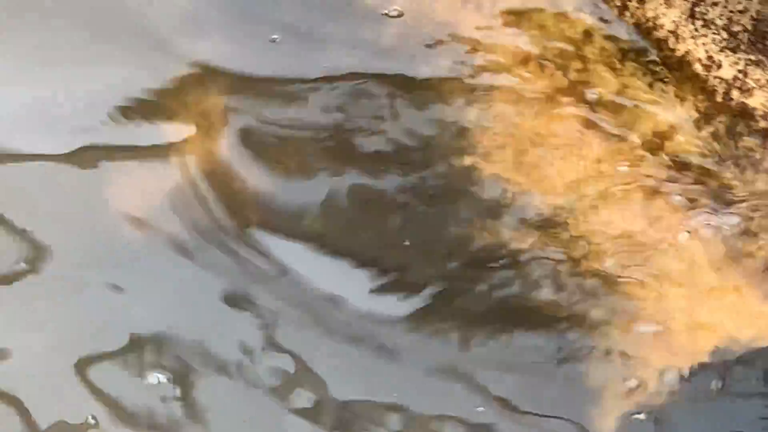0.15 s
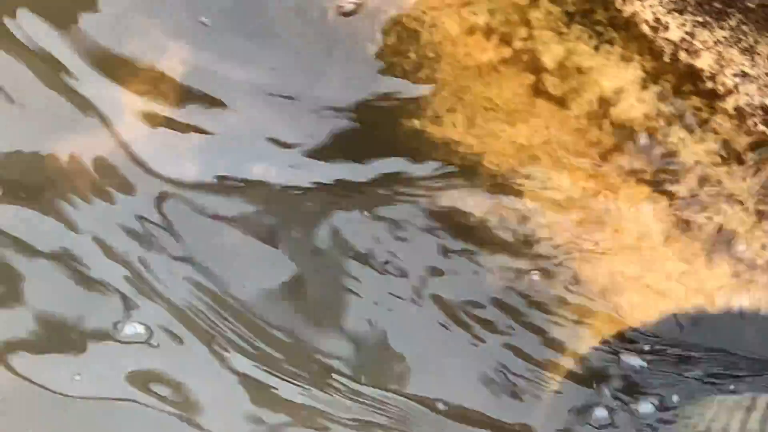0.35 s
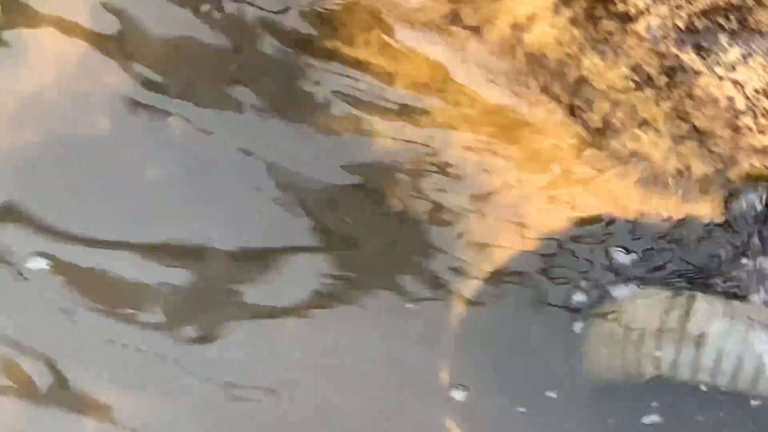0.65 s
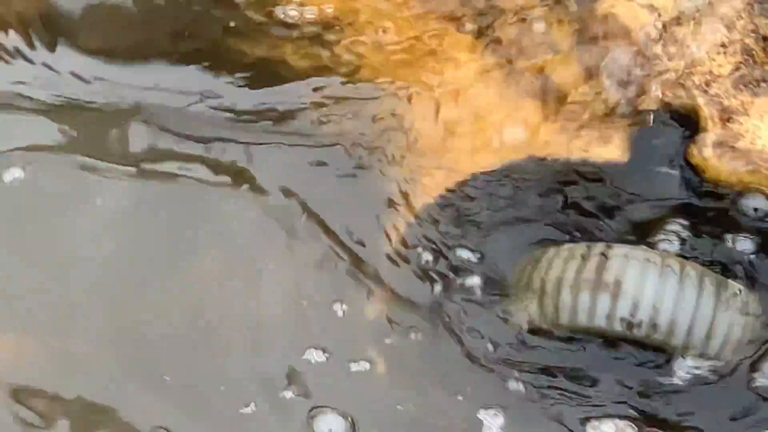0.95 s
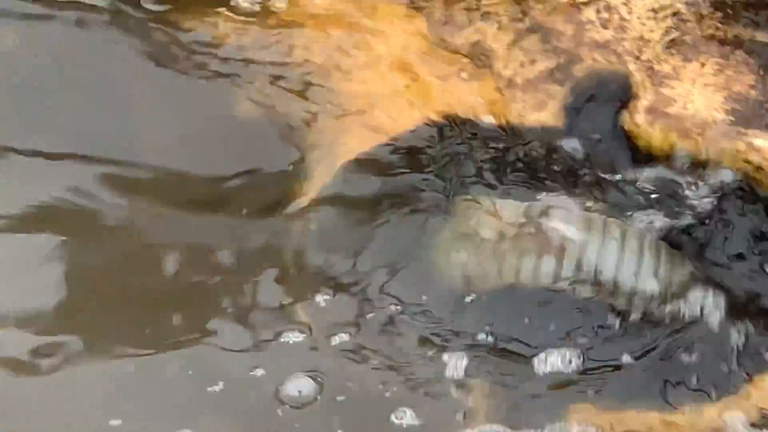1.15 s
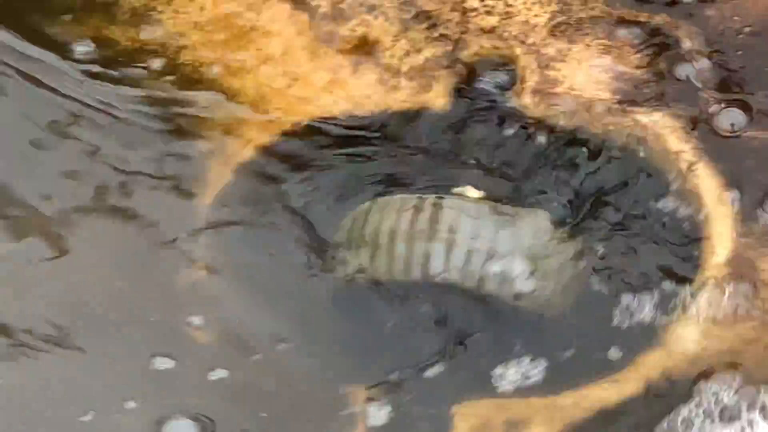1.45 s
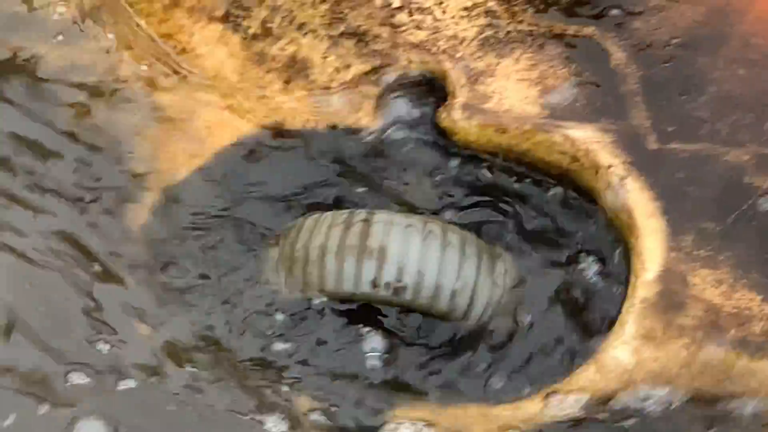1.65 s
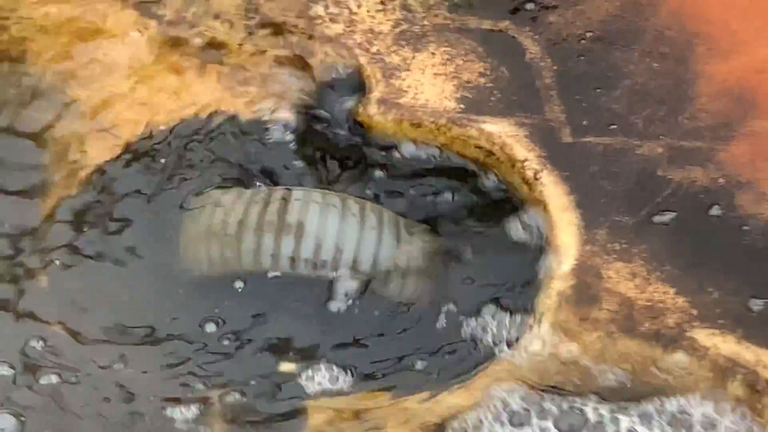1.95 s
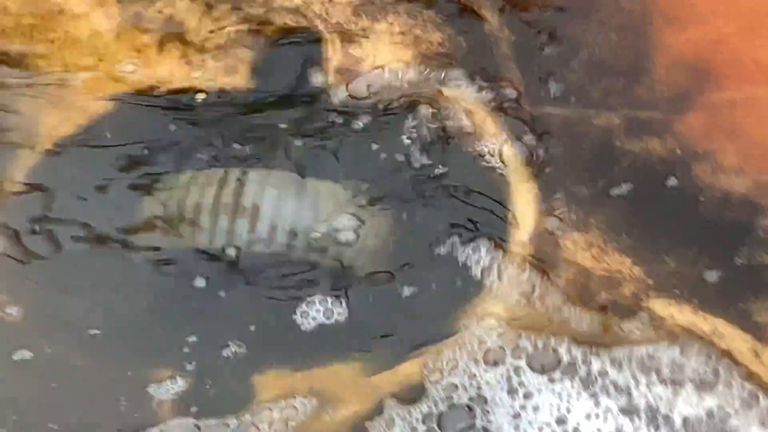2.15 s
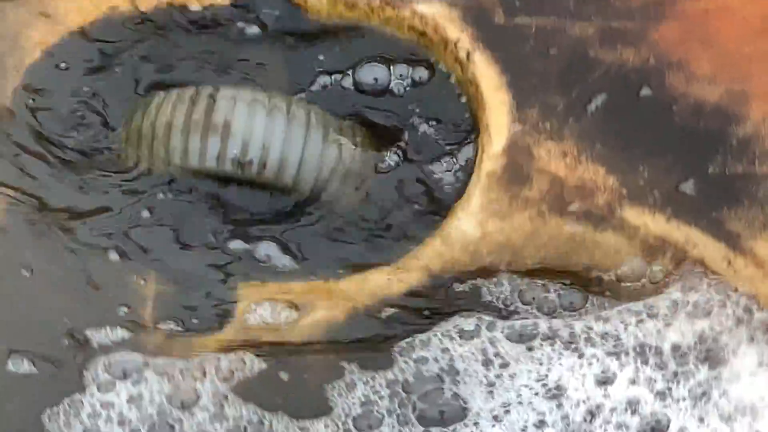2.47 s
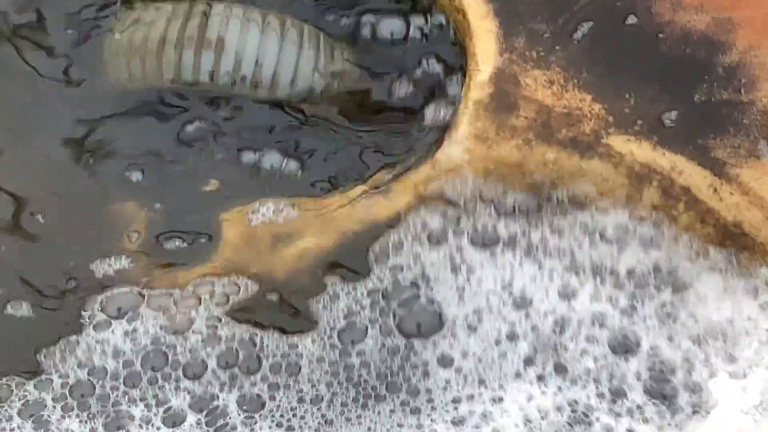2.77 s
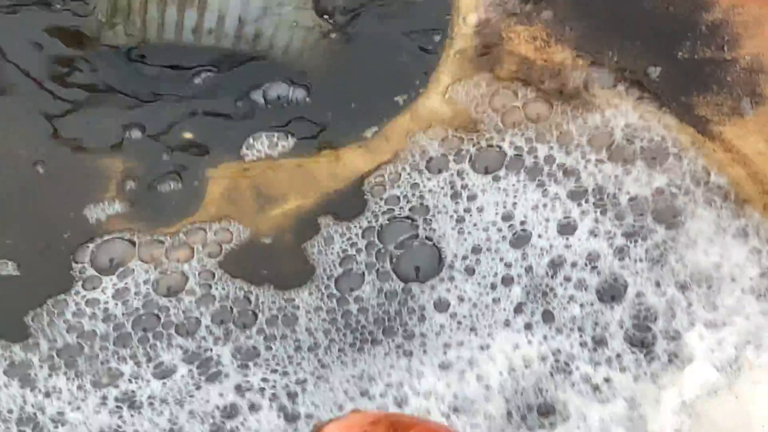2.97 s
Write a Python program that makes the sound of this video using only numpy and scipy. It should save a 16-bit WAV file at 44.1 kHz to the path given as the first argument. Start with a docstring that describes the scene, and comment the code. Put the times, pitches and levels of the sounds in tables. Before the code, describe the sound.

Small waves slap a dock right under a close stereo microphone. Light, uneven wet slaps come several per second; air gulps at 0.55, then a deep hollow glug with a low thud at 0.9. Droplets tick around 1.1, the strongest splashes land at 1.4, quick high bubble chirps at 1.85, more slaps from 2.1, and a short low gulp with thud at 2.6. A very faint trickling hiss runs underneath.

```python
"""At a dock on a lake, small waves lap right under a microphone with two ports.
Each slap is a short spray of noise and tiny ringing bubbles. Trapped air gulps low or chirps
high as gliding tones, and bursting droplets click as tiny puffs of bright noise.
The heaving water thuds low in the hull of the dock (deep noise that swells and sinks),
over a faint wash of flickering hiss and small drips."""
import sys
import numpy as np
from scipy import signal
from scipy.fft import rfft, irfft
from scipy.io import wavfile
from scipy.ndimage import uniform_filter1d

SR = 44100
rng = np.random.default_rng(int(sys.argv[2]) if len(sys.argv) > 2 else 0)


def wrap_up_sound(samples):
    """Save the sound to the file named by the first command line argument, as 16-bit audio."""
    columns = np.atleast_2d(samples).T
    # keep every value between -1 and 1, then stretch to whole-number steps
    tamed = np.clip(columns, -1, 1)
    steps = np.round(tamed * 32767).astype(np.int16)
    wavfile.write(sys.argv[1], SR, steps)


N = 136710  # length in samples, about 3.1 s

# colour common to all spray: f/Hz, relative level/dB
SPRAY_COLOUR = [(250, 8.5), (500, 5), (1400, 1.5), (2300, 1.5), (3200, -5.5), (4500, 6.5), (6800, -10.5),
                (9500, 0), (16000, -18.5)]
# three places the spray comes from; those nearer the middle lose some of the left port's lead: lag/s
PLACE_LAG_S = (0, .0001, .0004)


def slaps():
    """A wave hits the dock and throws up spray: a quick rise, a fade and a faint tail."""
    # slaps: t/s, relative level/dB, then the balance of low, middle and high spray, each level/dB
    slap_table = [(0.026, -32.5, -5, -35, -36.5), (0.108, -34, -0.5, -14, -16),
                  (0.209, -34, -9.5, -9.5, -15), (0.286, -29, -10, -9, -35), (0.343, -37, -5, -11, -12.5),
                  (0.381, -39, 0, 5, -10), (0.402, -26, -9, -28, -16), (0.492, -31.5, 11, -1, -23),
                  (0.549, -28, -6, -3.5, -7), (0.77, -27, -6, -17, -32.5),
                  (0.83, -36.5, -14.5, -12.5, -31.5), (1.05, -39, -20, 1, -4.5), (1.11, -41.5, -4, 12, -17),
                  (1.187, -39.5, -5, -4, 4), (1.224, -34, -27, -6.5, -16), (1.37, -21, -6.5, -7, -12.5),
                  (1.431, -24, -7, -7.5, -7.5), (1.453, -29.5, -5, -8, -11), (1.642, -35, -40, 2, -14.5),
                  (1.664, -38, -1, -21, -25), (1.851, -32.5, -38, 2, -3), (1.886, -36, -7, -5, -14.5),
                  (2.011, -44, -24, 2, -11), (2.082, -24, 2.5, -9.5, -43), (2.092, -35.5, -9, 3.5, -6),
                  (2.196, -36, 8, 13, -20), (2.225, -28, -8, -11.5, -10), (2.294, -37, -1.5, -12, -32),
                  (2.401, -33.5, -7, -7, -29), (2.423, -33, -14, 0, -10.5), (2.56, -35, 9, -10, -46),
                  (2.779, -39.5, -11.5, -11, -37), (2.82, -35.5, -23, -18, -28),
                  (2.858, -38.5, -14, -13, -11), (2.892, -38.5, -5, -6, -8.5), (2.986, -30, -9.5, -13, -10),
                  (3.08, -36.5, -12.5, -7, -27)]
    # middle of the low, middle and high spray: f/Hz
    band_hz = (900, 2600, 8000)
    rise_s, fade_s, tail_s, tail_db = 0.0012, 0.0067, 0.019, -10.5
    lead_s, lead_db = 0.007, -17  # first droplets before the blow
    fizz_share, all_slaps_db = 0.24, -3.5
    length = 4096
    out = np.zeros((len(PLACE_LAG_S), N))
    fizz = bubbles(N, 2500, 3.5, 600, 12980, cycles=3.0)

    t = np.arange(length) / SR
    lead = amp(lead_db) * np.minimum(t / lead_s, 1)
    since_blow = np.maximum(t - lead_s, 0)
    rise = 1 - np.exp(-(since_blow / rise_s) ** 2)
    fade = np.exp(-(since_blow / fade_s) ** 1.36)
    tail = amp(tail_db) * np.exp(-since_blow / tail_s)
    shape = (lead + rise) * (fade + tail)

    for k, (s, level_db, low_db, mid_db, high_db) in enumerate(slap_table):
        # each slap takes another stretch of the fizz
        spray = fizz_share * np.roll(fizz, -round(s * SR))[:length]
        spray = spray + (1 - fizz_share) * rng.standard_normal(length)
        balance = np.array([low_db, mid_db - 2, high_db - 3.5])
        balance = balance - balance.max()  # the strongest band stays at 0 dB
        spray = coloured(coloured(spray, SPRAY_COLOUR), list(zip(band_hz, balance)))
        slap = evened(spray * shape) * shape.std()
        place = out[k % len(out)]  # the places take turns
        add(place, s - 0.0015 - lead_s, amp(level_db + all_slaps_db) * slap)
    return out


def gulps():
    """A large pocket of trapped air gives a low, slightly rough tone that sags in pitch."""
    # gulps: t/s, level/dB, pitch halfway through f/Hz, length/s
    gulp_table = [(0.402, -28, 178, 0.024), (0.457, -31.5, 342, 0.017), (0.552, -16.5, 393, 0.014),
                  (0.562, -21, 237, 0.027), (0.882, -16.5, 177, 0.021), (0.888, -10.5, 75, 0.031),
                  (0.948, -13.5, 107.8, 0.023), (1.375, -20, 357, 0.032), (1.671, -29, 239, 0.0093),
                  (1.817, -25.5, 253, 0.0083), (2.079, -32.5, 367.5, 0.028), (2.288, -23, 81.3, 0.063),
                  (2.298, -34, 314, 0.054), (2.425, -29, 369, 0.022), (2.585, -13.5, 132, 0.012),
                  (2.828, -28, 316, 0.022)]
    sag, rough = 0.12, 0.15  # pitch shift each way and roughness, as shares
    out = np.zeros(N)
    for s, level_db, hz, length in gulp_table:
        add(out, s, amp(level_db) * tone(hz * (1 + sag), hz * (1 - sag), length, rough))
    return out


def chirps():
    """A small pocket of air gives a short gliding tone; the rougher it is, the more it hisses."""
    # chirps: t/s, level/dB, start f/Hz, end f/Hz, length/s, roughness 0-1
    chirp_table = [(0.799, -47.5, 1334, 1666, 0.046, 0.03), (1.496, -36, 2240, 2480, 0.028, 0.48),
                   (1.509, -34.5, 1517, 2930, 0.031, 0.45), (1.51, -38, 4320, 5030, 0.042, 0.47),
                   (1.537, -40, 2310, 2400, 0.016, 0.46), (1.664, -28.5, 647, 383, 0.0099, 0.16),
                   (1.779, -44.5, 2110, 2520, 0.0063, 0), (1.8543, -19, 3320, 2730, 0.0058, 0.03),
                   (1.857, -29.5, 4340, 4810, 0.021, 0.83), (1.87, -24.5, 3706, 2483, 0.01195, 0.42),
                   (1.877, -28, 2963, 1640, 0.014, 0.58), (2.079, -25, 790, 464, 0.0121, 0.41),
                   (2.08, -34, 2260, 1940, 0.0066, 0.07), (2.562, -24.5, 1103, 1170, 0.0075, 0.22),
                   (2.615, -45.5, 1800, 2490, .014, 0), (2.617, -29.5, 1120, 1175, 0.0061, 0)]
    hiss_db = -16  # at full roughness
    out = np.zeros(N)
    for s, level_db, hz0, hz1, length, rough in chirp_table:
        sound = tone(hz0, hz1, length, rough)
        hiss = evened(coloured(rng.standard_normal(2048), SPRAY_COLOUR))[:len(sound)]
        hiss = hiss * np.hanning(len(sound))
        add(out, s, amp(level_db) * (sound + amp(hiss_db) * rough * hiss))
    return out


def ticks():
    """A droplet bursts as a crisp, bright click: noise that dies at once."""
    # single droplets: t/s, level at the start/dB
    tick_table = [(0.382, -44), (1.053, -50), (1.094, -40), (1.1113, -34), (1.225, -40), (1.258, -40.5),
                  (1.747, -52), (1.811, -45.5), (2.838, -38)]
    # colour of a click: f/Hz, relative level/dB
    tick_colour = [(1500, -26), (9500, 13), (15000, 1)]
    fade_s = 0.0009
    out = np.zeros(N)
    t = np.arange(512) / SR
    for s, level_db in tick_table:
        noise = evened(coloured(rng.standard_normal(len(t)), tick_colour))
        add(out, s, amp(level_db) * noise * np.exp(-t / fade_s))
    return out


def heave():
    """The push of the water thuds in the hull: lumpy low noise that swells and sinks."""
    # loudness of the thudding: t/s, level/dB
    heave_level = [(0, -40.5), (.18, -37), (.25, -31.5), (.35, -40), (.5, -30), (.6, -33.5), (.72, -42.5),
                   (0.898, -22.5), (0.982, -27.5), (1.071, -47), (1.65, -36.5), (2.0, -40.5), (2.2, -40),
                   (2.31, -34), (2.47, -39.5), (2.601, -28), (2.75, -38), (3.1, -41)]
    # colour of the thudding: f/Hz, relative level per Hz/dB
    thud_colour = [(20, -34.5), (44, 1.5), (81, 7.5), (288, -12.5), (367, -15), (500, -31.5), (650, -51.5),
                   (1100, -120)]
    s, level_db = np.transpose(heave_level)
    low = evened(coloured(rng.standard_normal(N), thud_colour))
    loudness = np.sqrt(uniform_filter1d(low ** 2, 2500))
    low = low / (loudness + 1.8)  # holds back the largest lumps
    return evened(low) * amp(np.interp(np.arange(N) / SR, s, level_db))


def wash():
    """Water trickles as a faint flickering hiss, with small drips ringing as bubbles."""
    # common loudness of hiss and drips: t/s, relative level/dB
    trickle_level = [(0, -64), (.45, -60), (0.703, -62.5), (0.949, -59.5), (1.12, -56.5), (1.3, -58.5),
                     (2.3, -65), (2.75, -61.5), (2.869, -54.5), (3.1, -64.5)]
    # colour of the hiss: f/Hz, relative level per Hz/dB
    wash_colour = [(88, -33), (150, 0.5), (960, -18.5), (2270, -25.5), (5460, -35.5), (9260, -44.5),
                   (14500, -47.5)]
    hiss_db, drips_db = 3, -6  # added to the common loudness
    s, level_db = np.transpose(trickle_level)
    flicker = amp(4.5 * evened(narrow(N, 28).real))
    drips = bubbles(N, 110, 3.2, 800, 4500, cycles=6.5)
    drips = coloured(drips, [(500, 0), (5000, -8)])
    hiss = evened(coloured(rng.standard_normal(N), wash_colour)) * flicker
    both = amp(hiss_db) * hiss + amp(drips_db) * evened(drips)
    return both * amp(np.interp(np.arange(N) / SR, s, level_db))


def tone(hz0, hz1, length, rough):
    """A pocket of air: a gliding tone that swells and dies, partly smeared in pitch."""
    u = np.arange(0, length, 1 / SR) / length  # 0 at the start, 1 at the end
    turn = np.exp(2j * np.pi * np.cumsum(hz0 + (hz1 - hz0) * u) / SR)
    rough = np.clip(rough, 0, 1)
    smear = narrow(4096, 0.5 * hz0)[1000:1000 + len(u)]
    swell = np.sin(np.pi * u ** 0.64)
    return swell * (turn * (1 - rough + rough * smear)).imag


def bubbles(length, per_s, spread_db, lo_hz, hi_hz, cycles):
    """Sparse tiny bubbles of 30 sizes, each ringing at its own pitch and fading over some cycles."""
    strength = amp(spread_db * np.minimum(rng.exponential(1, length), 4))
    strength = strength * (rng.random(length) < per_s / SR)  # most moments hold no bubble
    kind = rng.integers(0, 30, length)
    out = np.zeros(length)
    for k, hz in enumerate(np.geomspace(lo_hz, hi_hz, 30)):
        c = np.arange(int(4 * cycles * SR / hz)) * hz / SR  # time in cycles
        ring = (1 - np.exp(-c)) * np.exp(-c / cycles) * np.sin(2 * np.pi * c)
        ring = ring * np.sqrt(hz / hi_hz)  # lower bubbles ring more softly
        out += signal.oaconvolve(strength * (kind == k), ring)[:length]
    return evened(out)


def ragged(x, depth_db, size):
    """Breaks a sound into uneven droplets: random loud and soft patches, size frames by about 1 kHz."""
    z = signal.stft(x, nperseg=128, noverlap=96)[2]  # one frame every 32 samples
    patches = uniform_filter1d(rng.standard_normal(z.shape), size=3, axis=-2)
    patches = uniform_filter1d(patches, size=size, axis=-1)
    gain = amp(depth_db * evened(patches))
    return signal.istft(z * evened(gain), nperseg=128, noverlap=96)[1][..., :N]


def narrow(length, width_hz):
    """Slow complex noise that smears a tone over roughly width_hz."""
    z = rng.standard_normal((2, length))
    window = int(SR / width_hz / 2) + 1
    z = uniform_filter1d(uniform_filter1d(z, window), window)
    return (z[0] + 1j * z[1]) / np.sqrt(np.mean(z ** 2) * 2)


def amp(db):
    """Turns decibels into a factor."""
    return 10 ** (np.asarray(db) / 20)


def evened(x):
    """Scales a sound to an average (RMS) strength of 1."""
    return x / np.sqrt(np.mean(x ** 2) + 1e-20)


def read(points, hz):
    """Reads a curve of (f/Hz, value) points, with pitch spaced as the ear hears it (log)."""
    f, value = np.transpose(points)
    return np.interp(np.log(hz + 1), np.log(f + 1), value)


def coloured(x, points):
    """Shapes the spectrum by (f/Hz, level/dB) points."""
    hz = np.fft.rfftfreq(x.shape[-1], 1 / SR)
    return irfft(rfft(x) * amp(read(points, hz)), x.shape[-1])


def add(mix, s, sound):
    """Adds a sound to the mix at s seconds, cut off at the end of the mix."""
    part = mix[..., round(s * SR):][..., :sound.shape[-1]]
    part += sound[..., :part.shape[-1]]


def ports(x, lag_s):
    """One place reaches the two microphone ports with differing phase and level."""
    # lead of the left port before the lag is taken off: f/Hz, phase/rad
    port_phase = [(0, 0), (300, .15), (2500, 7.5), (8900, 6.5), (11500, 3.2), (14000, 0), (16500, -3)]
    # left port against right: f/Hz, level/dB
    port_balance = [(300, 0), (700, 2), (2500, -4.5), (8000, 0)]
    hz = np.fft.rfftfreq(N, 1 / SR)
    f, lead = np.transpose(port_phase)
    lag_hz = np.interp(hz, [150, 2500, 7000], [0, 2500, 300])  # the lag acts most near 2500 Hz
    lead = np.interp(hz, f, lead) - 2 * np.pi * lag_s * lag_hz
    # half the difference goes to each port, in opposite directions
    half = np.exp(0.5j * lead) * amp(read(port_balance, hz) / 2)
    return irfft(rfft(x) * np.array([half, 1 / half]), N)


def scene():
    """Sums the three places through both ports; the heave is the same in both."""
    places = ragged(slaps(), 3.5, size=5)
    places += ragged(np.array([wash(), wash(), wash()]), 4.78, size=30)
    places[0] += gulps() + chirps()
    places[1] += ticks()
    return heave() + sum(ports(x, lag) for x, lag in zip(places, PLACE_LAG_S))


def record(dry):
    """The band limit of the recorder: a steep filter removes the highest treble."""
    edge_hz = 16300
    low_pass = signal.firwin(511, edge_hz, window=("kaiser", 9), fs=SR)
    return signal.oaconvolve(dry, low_pass[None], "same")


dry = scene()
out = record(dry)
wrap_up_sound(out)
```